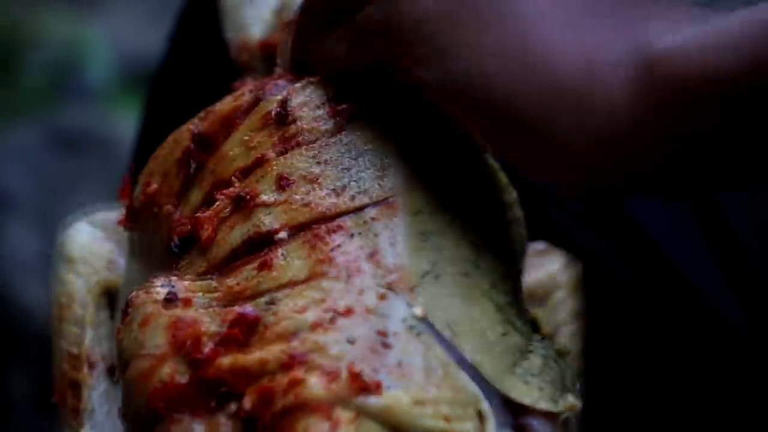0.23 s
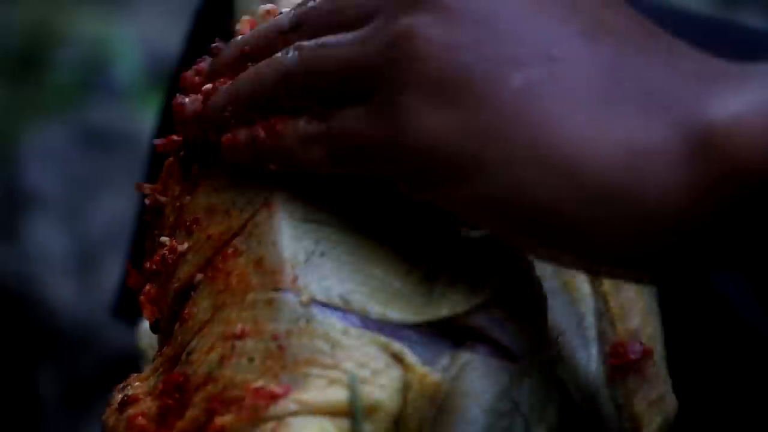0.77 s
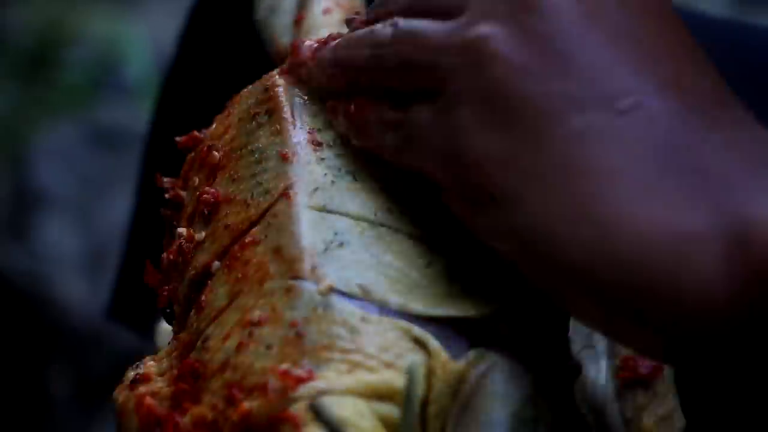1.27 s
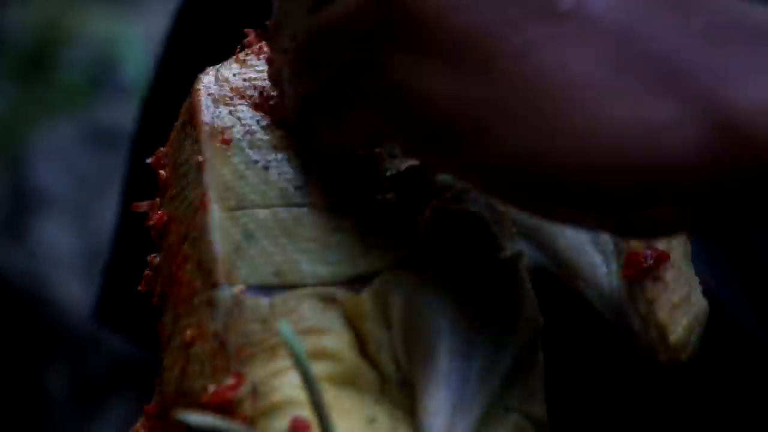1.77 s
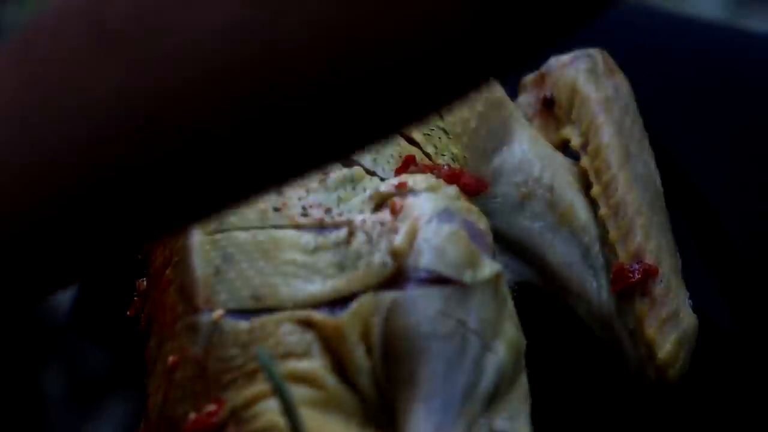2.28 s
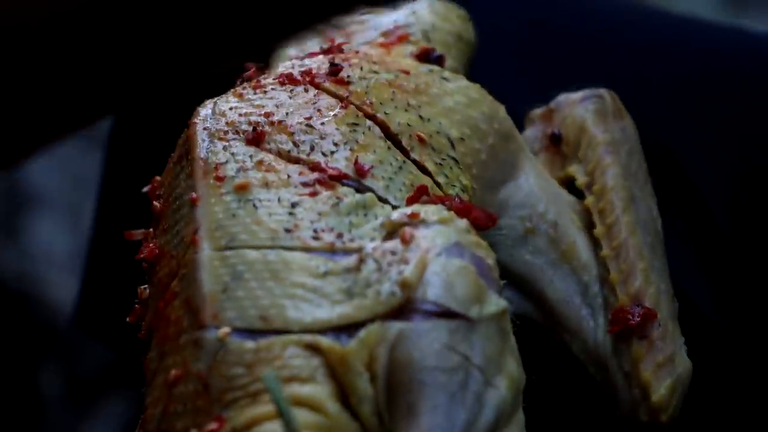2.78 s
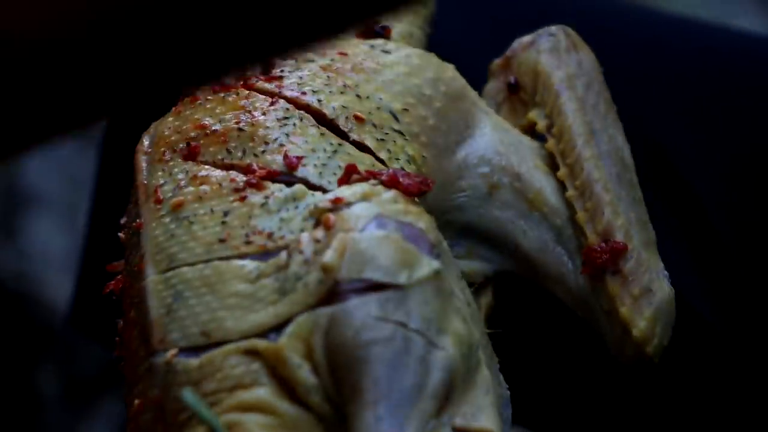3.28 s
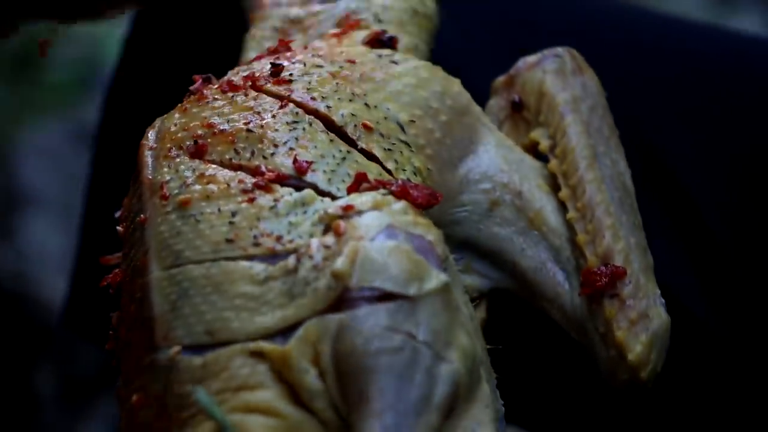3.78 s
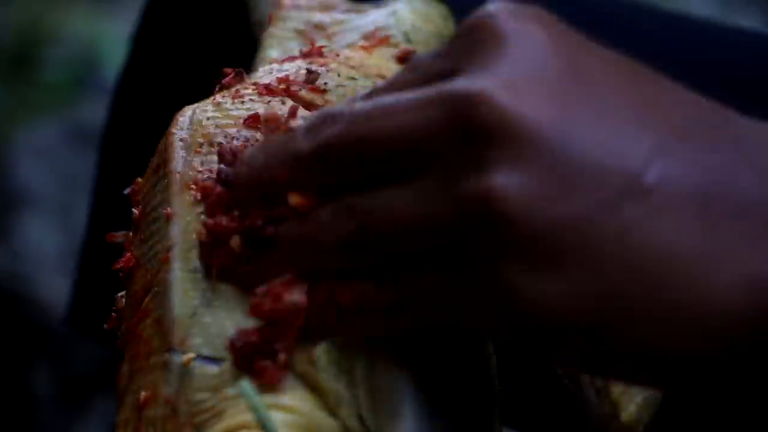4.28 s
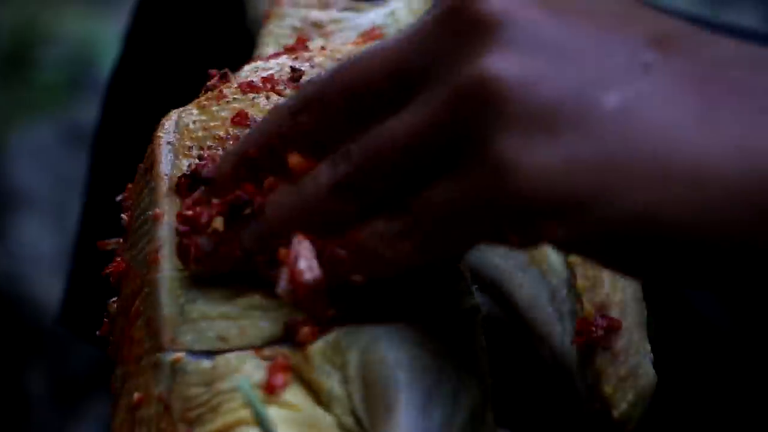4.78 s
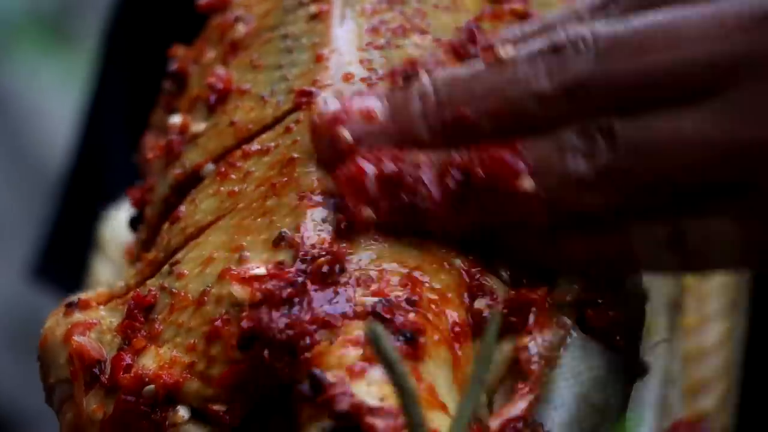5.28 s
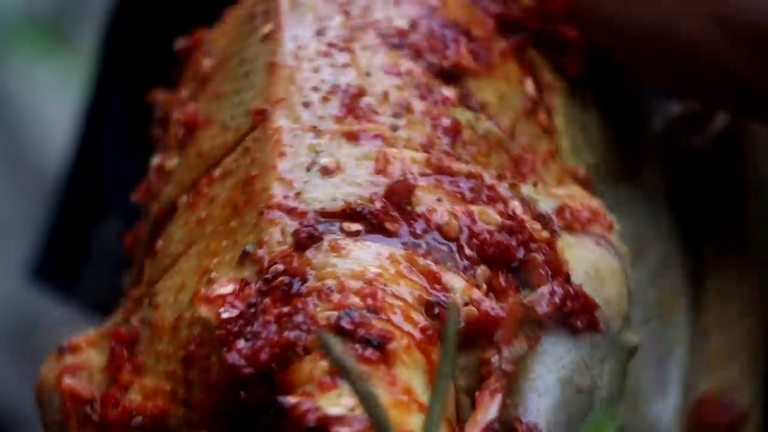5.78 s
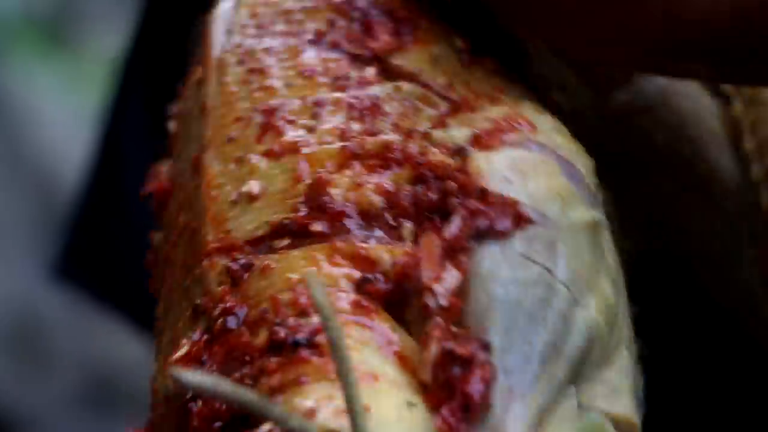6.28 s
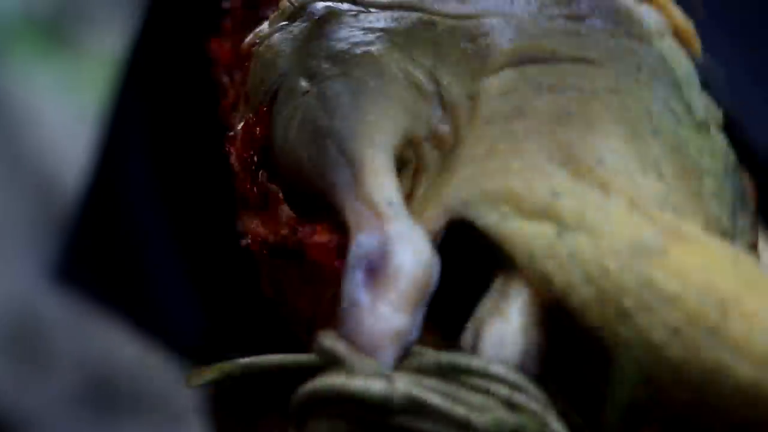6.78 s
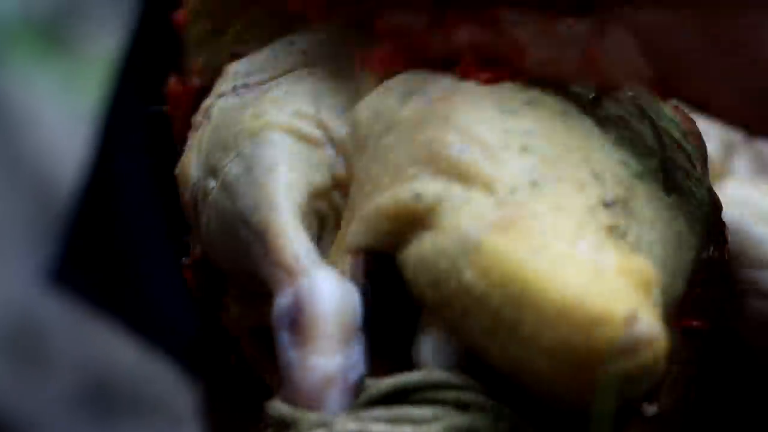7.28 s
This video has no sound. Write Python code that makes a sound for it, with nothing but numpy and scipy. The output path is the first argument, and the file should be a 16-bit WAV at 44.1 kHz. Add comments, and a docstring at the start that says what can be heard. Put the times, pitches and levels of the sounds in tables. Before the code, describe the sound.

Steady brook water, faint insects and small wet ticks of rubbed paste, a low throb at first, then one loud overloaded firewood-like snap.

```python
"""A forest stream rushes and gurgles over rocks, a low throb sounds for the first two seconds, and close by
wet paste is rubbed into a raw bird. Insects whine and chirp, and a fly passes.
Late on comes one sharp, splintering crack, like firewood popping; it overloads the microphone.
Water, rubbing, ticks and splits use shaped noise or short rings; throb, fly and most insects use sine waves.
The trees' answer is the crack, insects and gulps smeared by fading noise."""
import sys
import numpy as np
from scipy import signal
from scipy.fft import rfft, irfft, next_fast_len
from scipy.io import wavfile
from scipy.ndimage import uniform_filter1d, map_coordinates

SR = 44100
rng = np.random.default_rng(int(sys.argv[2]) if len(sys.argv) > 2 else 0)


def int16_out(signal):
    """Quantize to a 16-bit WAV file."""
    q = np.round(np.clip(np.atleast_2d(signal).T, -1, 1) * 32767)
    wavfile.write(sys.argv[1], SR, q.astype(np.int16))


N = 332514
TIME = np.arange(N) / SR

# strength of the stream, before a small trim of the rush: time_s, rush_db
STREAM_FLOW = [(0, -51.5), (3.9, -52), (4.45, -51.5), (4.7, -48.5), (5.1, -48.5), (7.54, -48.5)]
# tone colour of the rushing water: pitch_hz, relative_db (per Hz)
WATER_COLOUR = [(20, -10.5), (55, -5.5), (110, -9.5), (190, -9), (290, -14), (430, -16), (570, -12),
                (1300, -13.5), (1950, -18.5), (3100, -14.5), (3650, -22), (5500, -28), (9500, -30.5),
                (15500, -35)]
# families of bubbles and droplets: pitch_hz, spread (of log pitch), rate_per_s, life_cycles,
# smallest_level_db (at average flow)
BUBBLE_FAMILIES = [(656.5, 0.205, 22, 39, -55), (1231, 0.168, 55, 51, -52), (2113, 0.219, 70, 36, -52.5),
                   (2893, 0.065, 90, 57.5, -51.5), (2890, 0.11, 16, 17, -43), (6000, 0.33, 16, 8, -47)]
# the biggest gulps among the rocks: start_s, length_s, start_hz, end_hz, peak_db
BIG_GULPS = [(0.111, 0.021, 2140, 2940, -47.5), (0.412, 0.037, 750, 2500, -46.5),
             (.46, 0.015, 2780, 2070, -45), (2.264, 0.056, 504, 670, -48.5), (2.36, 0.022, 844, 940, -46.5),
             (2.678, 0.023, 1140, 1130, -45.5), (3.025, 0.036, 692, 2240, -49),
             (3.553, 0.012, 1360, 1450, -45.5), (4.309, 0.0085, 2500, 2400, -43.5),
             (4.585, 0.031, 1144, 1380, -49), (4.657, 0.019, 815, 724, -45.5),
             (4.733, 0.034, 890, 1120, -48), (5.563, 0.025, 1370, 1410, -46),
             (5.671, 0.036, 860, 950, -48.5)]
GLUGS_PER_S, GLUG_HZ = 7, 949  # smaller gulps at random moments
GLUG_RISE, GLUG_DB = 0.69, -53  # pitch rise per life, as a fraction; level of the smallest

# strokes of the hand: start_s, length_s, rumble_db, rubbing_db
HAND_STROKES = [(.1, 0.21, -47, -59), (.23, .22, -44, -77), (1.85, 0.58, -57, -65.5), (2.722, .6, -51, -67),
                (3.8, 0.66, -56.5, -56), (4.333, .5, -56.5, -56)]
STROKE_RISE_S, STROKE_FALL_S = .12, 0.16
REST_RUMBLE_DB, REST_RUB_DB, REST_END_S = -63.5, -67.5, 5.5  # light contact between the strokes
# the clearest wet ticks of the paste, before a shared delay and trim: start_s, level_db, treble_db
CLEAR_TICKS = [(0.106, -35, 19), (0.672, -31, -23), (0.9195, -29, -16), (1.4187, -29, 7), (2.2263, -33, -3),
               (2.635, -31, -28), (3.5538, -27, -19), (3.9421, -22, 12), (4.8315, -33, -5),
               (4.869, -29, -13), (4.8813, -27.5, -19), (5.3053, -32, 10), (5.3343, -28, -18),
               (5.4053, -35, 28), (5.6565, -28, -17), (5.8765, -19.5, 5.5), (5.938, -26.5, 14),
               (5.975, -27, 3), (5.9998, -23, -11), (6.0227, -26.5, -3), (6.8039, -21.5, 5.5)]
# tone colour of a wet tick: pitch_hz, relative_db
TICK_COLOUR = [(200, -23), (1500, -18), (3000, 8.5), (4500, -5), (8000, -15), (16000, -22)]
FAINT_TICKS_PER_S, FAINT_TICK_DB = 7, -43.5  # level before the same trim
FAINT_SPREAD_DB, FAINT_TREBLE_DB = 4, 22  # level varies up and down by the spread

# the crack and its splinters: start_s, level_db (each part is set against it), treble_db, burst_t60_s
SPLITS = [(6.2757, 11.5, -9.5, 0.018), (6.2876, -6, -9, .015), (6.2919, -5, 7, 0.009),
          (6.3016, -6.5, 7, .012), (6.3226, -17.5, 7, 0.013), (6.3430, 1, -1.5, 0.015),
          (6.3836, -10.5, 13, 0.015), (6.4080, -7, 10, 0.015), (6.425, -4, 4, 0.015),
          (6.5085, -27.5, 4, .015), (6.5376, -1, -5.5, 0.015)]
# ringing modes of the wood: pitch_hz, relative_db (varied at random), t60_s (for a 0.017 s burst)
WOOD_MODES = [(1200, -12.5, 0.026), (1560, -22.5, 0.015), (1830, -14, 0.033), (2537, -4.5, 0.027),
              (2670, -16, 0.015), (3020, -3, 0.028), (3175, -6, 0.013), (3636, -6, 0.025),
              (4250, -7.5, 0.031), (4700, -15, 0.0097), (5410, -15, 0.028), (7320, -12.5, 0.017),
              (9380, -24, .012)]
# tone colour of a split's noise: pitch_hz, relative_db
SPLIT_COLOUR = [(40, -30), (110, -18), (250, -34), (420, -12), (600, -13), (780, -8.5), (1000, -19.5),
                (1250, -9.5), (1700, -7.5), (2100, -22), (2700, 0.5), (4200, -3.5), (5500, -6.5),
                (8000, -6.5), (12000, -11), (16000, -19.5)]
THUMP_HZ, THUMP_T60_S, THUMP_DB = 84, 0.077, -46  # low push of a split, relative to its level

# swells of the low throb: peak_s, half_length_s (to 1/e of the peak), level_db
THROB_SWELLS = [(.045, .06, -35.5), (0.391, .04, -37.5), (.52, 0.054, -41.5), (.66, 0.065, -47.5),
                (.8, 0.055, -38.5), (.9, .035, -42.5), (1.07, 0.092, -38), (1.301, .05, -37.5),
                (1.391, .04, -44), (1.491, .055, -39.5), (1.661, 0.074, -41), (1.769, .04, -40),
                (1.921, .055, -42)]
# pitch of the throb: time_s, pitch_hz
THROB_GLIDE = [(.05, 81.5), (.25, 51.9), (.42, 57.4), (.65, 50), (.8, 56.05), (1.48, 57.13), (1.62, 50.8),
               (2, 45.6)]
FLUTTER_DB = .6  # unsteadiness of the throb
# dull bumps of handling: start_s, pitch_hz, t60_s, starting_level_db
HANDLING_BUMPS = [(.27, 28, 0.28, -35), (4.826, 12.3, 0.95, -38)]
# the passing fly: time_s, wingbeat_hz, level_db
FLY_PASS = [(5.3, 279, -94), (5.66, 301, -70), (5.74, 299.3, -53), (5.85, 290.5, -51.5), (5.95, 280.5, -61),
            (6.15, 269.4, -69), (6.25, 272, -105)]

# steady insects: pitch_hz, wander_hz, level_db
INSECT_WHINES = [(10060, 7.2, -66.5), (15290, 40, -77.5)]
# bouts of chirping: first_call_s, end_s, call_period_s, base_peak_db
CHIRP_BOUTS = [(0, 1.53, 0.19, -64), (1.63, 1.95, 0.18, -68), (2.075, 3.2, .205, -63),
               (3.39, 3.9, .205, -62), (3.965, 4.65, .192, -64)]
# pulses of one call: delay_s, added_db
CALL_PULSES = [(0, -0.5), (.048, -1), (.105, -8)]
CHIRP_HZ, CHIRP_FALL_HZ, PULSE_S = 8290, 190, 0.024
# insect trills: start_s, length_s, pitch_hz, level_db
INSECT_TRILLS = [(.65, .25, 6750, -82), (2.6, .2, 6640, -73), (3.6, 0.21, 6690, -77),
                 (4.827, 0.22, 4740, -66), (5.15, .45, 6750, -79), (5.38, .04, 9480, -65),
                 (5.61, 0.037, 9480, -61), (7.04, 0.35, 4680, -67), (7.15, .04, 9550, -65),
                 (7.34, .04, 9480, -64)]
# how long the trees answer: pitch_hz, t60_s
FOREST_DECAY = [(200, 0.54), (1200, 0.3), (3000, 0.64), (8000, 0.75), (15000, 0.84)]

# recording level; it dips briefly, and the end values hold before and after: time_s, gain_db
RECORDING_LEVEL = [(4.783, 4.5), (4.787, -20), (4.812, -43), (4.818, -11), (4.835, 1)]
TOP_HZ = 15800  # nothing is kept from here up


def amp(db):
    """Turn decibels into a gain."""
    return 10 ** (np.asarray(db) / 20)


def unit(x):
    """Scale to an rms (average strength) of 1."""
    return x / np.sqrt(np.mean(x ** 2) + 1e-20)


def fade(t, t60):
    """Die away steadily, by 60 dB in t60."""
    return np.exp(-np.log(1000) * t / t60)


def gate(s, length, attack, release):
    """Rise, hold and fall of a sound that starts at s."""
    rise = (TIME - s) / attack
    fall = (s + length - TIME) / release
    return np.clip(np.minimum(rise, fall), 0, 1)


def along(points, hz):
    """Read between (pitch, value) points on a log pitch axis."""
    f, v = np.transpose(points)
    return np.interp(np.log(hz + 1), np.log(f + 1), v)


def curves(rows):
    """Give one value per sample for each column after the time."""
    s, *cols = np.transpose(rows)
    return [np.interp(TIME, s, c) for c in cols]


def wobble(rate):
    """Draw a smooth random curve through rate random points a second."""
    return map_coordinates(rng.standard_normal(int(N * rate / SR) + 4), [TIME * rate])


def filtered(x, response):
    """Change the strength of each pitch in x by the given response."""
    m = next_fast_len(len(x) + 8192)  # spare room so the end does not wrap onto the start
    return irfft(rfft(x, m) * response(np.fft.rfftfreq(m, 1 / SR)), m)[:len(x)]


def band(hz, width_hz):
    """Make noise of rms 1 in a bell-shaped band of pitches."""
    return unit(filtered(rng.standard_normal(N), lambda f: np.exp(-.5 * ((f - hz) / width_hz) ** 2)))


def grit(spectrum, treble_db, size):
    """Make a short coloured noise of rms 1 with its treble raised or lowered."""
    shelf = [(3500, 0), (9000, treble_db)]
    return unit(filtered(rng.standard_normal(size), lambda f: amp(along(spectrum, f) + along(shelf, f))))


def add(track, s, sound):
    """Mix a sound into the track at time s."""
    part = track[max(round(s * SR), 0):][:len(sound)]
    part += sound[:len(part)]


def stream():
    """White water with bubbles on top; both follow the flow."""
    flow_db, = curves(STREAM_FLOW)
    gurgle = np.zeros(N)
    for hz, spread, rate, cycles, db in BUBBLE_FAMILIES:
        gurgle += amp(db) * bubbles(hz, spread, rate, cycles, rise=0.13, size_db=4.0)
    glugs = bubbles(GLUG_HZ, spread=.4, rate=GLUGS_PER_S, cycles=60, rise=GLUG_RISE, size_db=2.5)
    gurgle += amp(GLUG_DB) * glugs
    white_water = amp(flow_db - 0.91) * rush(WATER_COLOUR, patchy_db=1.5)
    return white_water + amp(flow_db - flow_db.mean()) * gurgle


def rush(spectrum, patchy_db):
    """Noise of rms 1 whose low and middle bands surge in random patches, like tumbling water."""
    hz, _, z = signal.stft(rng.standard_normal(N), SR, nperseg=512)
    field = uniform_filter1d(rng.standard_normal(z.shape), size=5, axis=0)  # blur across pitch
    field = unit(uniform_filter1d(field, size=10, axis=1))  # blur across time
    depth_db = along([(3500, patchy_db), (6000, .3)], hz)[:, None]
    patchy = signal.istft(z * amp(depth_db * field), nperseg=512)[1][:N]
    return unit(filtered(patchy, lambda f: amp(along(spectrum, f))))


def bubbles(hz, spread, rate, cycles, rise, size_db):
    """Each bubble rings briefly and rises in pitch as it nears the surface."""
    u = rng.random((int(rate * N / SR), 4))
    # turn two even random numbers into one bell-shaped one
    normal = np.sqrt(-2 * np.log(1 - u[:, 1])) * np.cos(2 * np.pi * u[:, 2])
    pitch = hz * np.exp(spread * normal)[:, None]
    size = amp(size_db * np.minimum(-np.log(1 - u[:, 3]), 4))[:, None]  # many small, few large
    t = np.arange(int(1.5 * cycles / hz * SR)) / SR
    age = t * pitch / cycles  # 1 = one life
    tone = np.sin(2 * np.pi * pitch * t * (1 + rise * age / 2))
    onset = 1 - np.exp(-t * pitch / 2)
    ring = size * tone * fade(age, 0.88) * onset
    at = (u[:, :1] * N).astype(int) + np.arange(len(t))
    return np.bincount(at.ravel(), ring.ravel(), N)[:N]


def gulps():
    """Large pockets of air ring and glide in pitch as they close."""
    out = np.zeros(N)
    for s, length, start_hz, end_hz, db in BIG_GULPS:
        u = np.linspace(0, 1, int(length * SR))
        phase = 2 * np.pi * np.cumsum(start_hz * (end_hz / start_hz) ** u) / SR
        swell = np.sin(np.pi * u ** 0.73)  # peaks before the middle
        add(out, s, amp(db) * swell * np.sin(phase))
    return out


def hands():
    """Each stroke's pressure brings dull rumble and soft rubbing, both bands of noise."""
    contact = gate(0, REST_END_S, STROKE_RISE_S, STROKE_FALL_S)
    rumble, rub = amp(REST_RUMBLE_DB) * contact, amp(REST_RUB_DB) * contact
    for s, length, rumble_db, rub_db in HAND_STROKES:
        pressure = gate(s, length, STROKE_RISE_S, STROKE_FALL_S)
        rumble = np.hypot(rumble, amp(rumble_db) * pressure)  # add as power
        rub = np.hypot(rub, amp(rub_db) * pressure)
    return rumble * band(28, 27) + rub * band(339, 100)


def paste():
    """Wet ticks are dying bursts of noise: some clear ones among faint, bright ones at random moments."""
    out, t = np.zeros(N), np.arange(2048) / SR
    envelope = fade(t, 0.0093) + amp(-16.5) * fade(t, 0.069)  # a snap and a weak tail
    faint = []
    for u, v in rng.random((int(FAINT_TICKS_PER_S * N / SR), 2)):
        faint.append((u * N / SR, FAINT_TICK_DB + FAINT_SPREAD_DB * (2 * v - 1), FAINT_TREBLE_DB))
    for s, db, treble_db in list(CLEAR_TICKS) + faint:
        add(out, s + 0.0011, amp(db - 8.5) * envelope * grit(TICK_COLOUR, treble_db, size=len(t)))
    return out


def cracks():
    """Each split is a noise burst that rings the wood's modes; the ground and things nearby throw it back."""
    out, t = np.zeros(N), np.arange(8192) / SR
    hz, mode_db, t60 = np.transpose(WOOD_MODES)[:, :, None]
    for s, db, treble_db, life in SPLITS:
        strength = amp(mode_db + 1.46 * rng.standard_normal(hz.shape)) * rng.choice([-1, 1], hz.shape)
        modes = strength * np.sin(2 * np.pi * hz * t) * fade(t, t60 * life / 0.017)
        ring = modes.sum(0)
        burst = grit(SPLIT_COLOUR, treble_db, size=len(t)) * fade(t, life)
        bounce = grit(SPLIT_COLOUR, treble_db - 8, size=len(t)) * fade(t, 0.004)  # off the rough ground
        scatter = grit(SPLIT_COLOUR, treble_db + 7.5, size=len(t))  # off things nearby
        scatter = scatter * fade(t, 0.078) * (1 - np.exp(-t / .003))
        thump = np.sin(2 * np.pi * THUMP_HZ * t) * fade(t, THUMP_T60_S)
        add(out, s, amp(db) * (amp(-9) * ring + amp(-7.0) * burst + amp(-20.0) * scatter))
        add(out, s, amp(db + THUMP_DB) * thump)
        add(out, s + .0026, amp(db - 12.5) * bounce)
    return out


def throb():
    """A fluttering low tone with a weak octave and some noise comes in swells and sinks at the end."""
    hz, = curves(THROB_GLIDE)
    phase = 2 * np.pi * np.cumsum(hz) / SR
    power = sum((amp(db) * np.exp(-((TIME - s) / half) ** 2)) ** 2 for s, half, db in THROB_SWELLS)
    flutter = amp(FLUTTER_DB * wobble(24.3))
    tone = np.sin(phase) + amp(-20) * np.sin(2 * phase) + amp(-14) * band(62, 42)
    return np.sqrt(power) * flutter * unit(tone)


def bumps():
    """Soft knocks of handling reach the microphone as a few slow, dying swings."""
    out, t = np.zeros(N), np.arange(SR // 2) / SR
    for s, hz, t60, db in HANDLING_BUMPS:
        add(out, s, amp(db) * np.sin(2 * np.pi * hz * t) * fade(t, t60))
    return out


def fly():
    """Wingbeats make a faint buzz of six harmonics that sinks in pitch as the fly passes."""
    hz, db = curves(FLY_PASS)
    phase = 2 * np.pi * np.cumsum(hz) / SR
    harmonics_db = [-3, 0.5, -24, -5, -2, -5.5]
    buzz = sum(amp(level) * np.sin((k + 1) * phase) for k, level in enumerate(harmonics_db))
    return amp(db) * unit(buzz)


def insects():
    """Wavering tones whine, evenly paced calls chirp in falling pulses, and narrow noise makes trills."""
    out = np.zeros(N)
    for hz, wander_hz, db in INSECT_WHINES:
        phase = 2 * np.pi * np.cumsum(hz + wander_hz * wobble(120)) / SR
        out += amp(db) * unit(np.sin(phase))
    u = np.linspace(0, 1, int(PULSE_S * SR))
    phase = 2 * np.pi * np.cumsum(CHIRP_HZ - CHIRP_FALL_HZ * u) / SR
    pulse = np.sin(np.pi * u) * np.sin(phase)
    for start, end, period, db in CHIRP_BOUTS:
        for s in np.arange(start, end, period):
            for delay, pulse_db in CALL_PULSES:
                add(out, s + delay, amp(db + pulse_db + rng.normal(0, 1.3)) * pulse)
    for s, length, hz, db in INSECT_TRILLS:
        swell = np.sqrt(np.abs(np.sin(np.pi * np.clip((TIME - s) / length, 0, 1))))
        out += amp(db) * swell * band(hz, 75)
    return out


def trees(x):
    """The forest's thin, diffuse answer: many scattered echoes, modelled as noise that dies away."""
    hz, t, z = signal.stft(rng.standard_normal(SR), SR, nperseg=256)
    tail = signal.istft(z * fade(t, along(FOREST_DECAY, hz)[:, None]), SR, nperseg=256)[1]
    return signal.fftconvolve(x, tail / np.linalg.norm(tail))[:N]


def scene():
    """All sources meet at one microphone; gulps and insects get more echo than the crack."""
    crack, far = cracks(), gulps() + insects()
    direct = stream() + far + hands() + paste() + crack + throb() + bumps() + fly()
    return (direct + amp(-22.5) * trees(crack) + amp(-15) * trees(far))[None]


def record(dry):
    gain_db, = curves(RECORDING_LEVEL)
    clipped = np.clip(dry[0] * amp(gain_db), -1, 1)
    return filtered(clipped, lambda hz: hz < TOP_HZ)[None]


dry = scene()
out = record(dry)
int16_out(out)
```